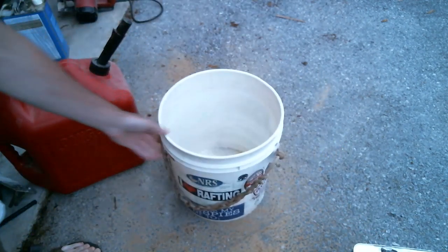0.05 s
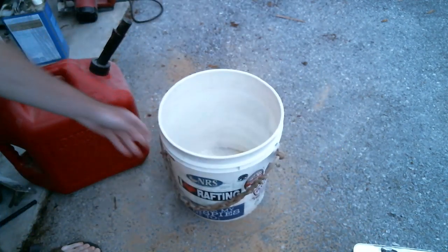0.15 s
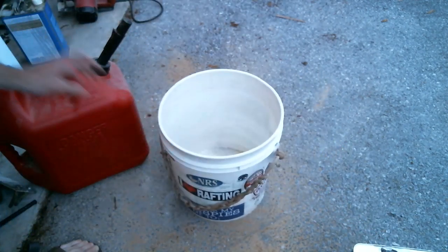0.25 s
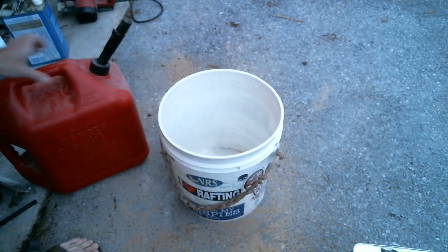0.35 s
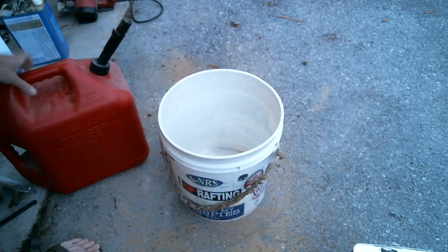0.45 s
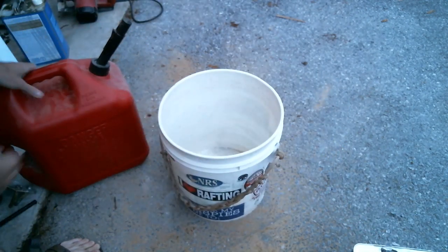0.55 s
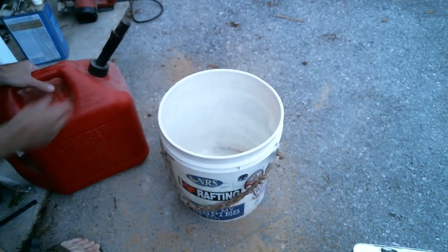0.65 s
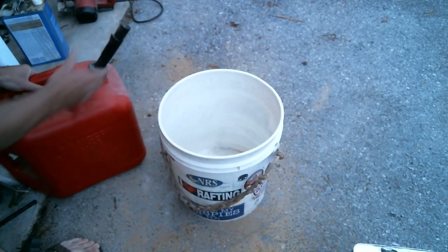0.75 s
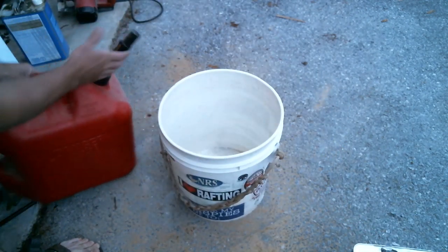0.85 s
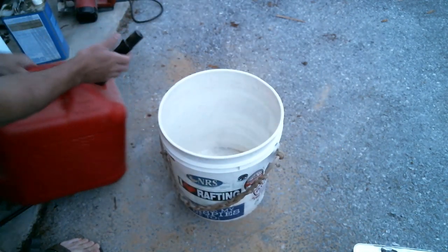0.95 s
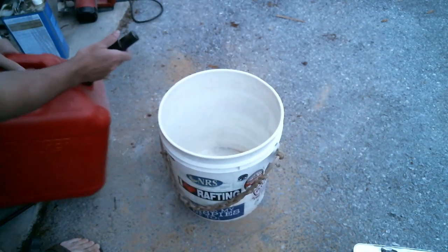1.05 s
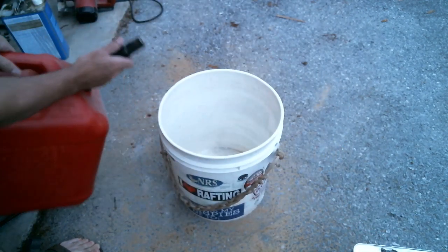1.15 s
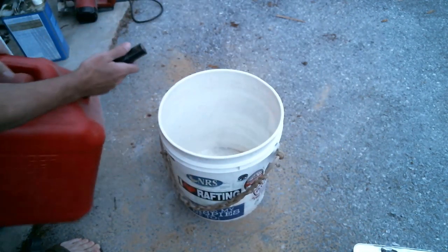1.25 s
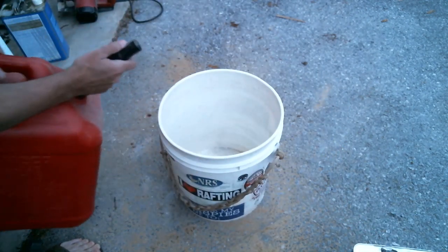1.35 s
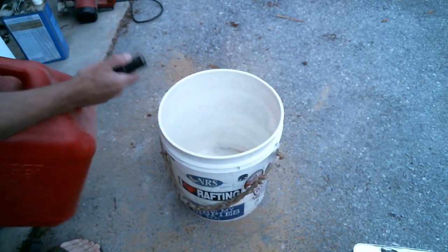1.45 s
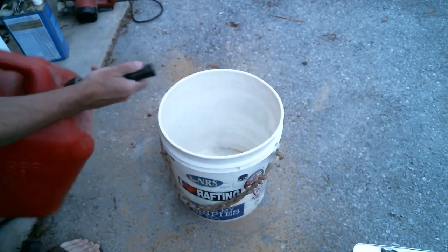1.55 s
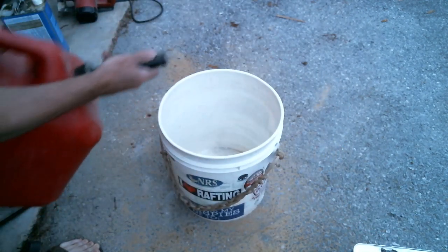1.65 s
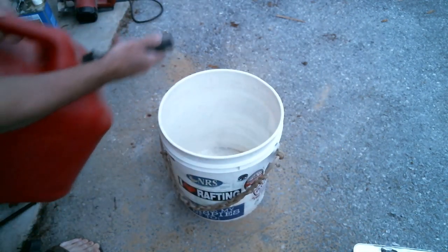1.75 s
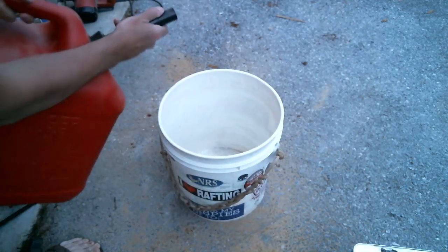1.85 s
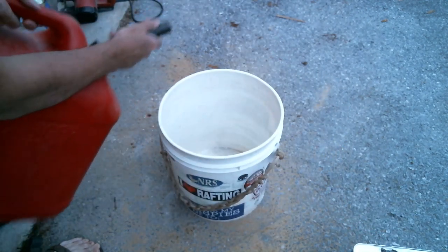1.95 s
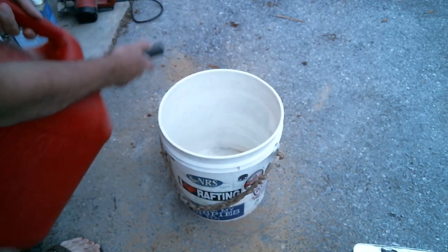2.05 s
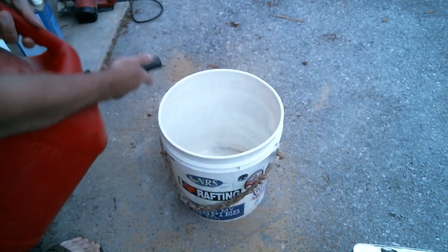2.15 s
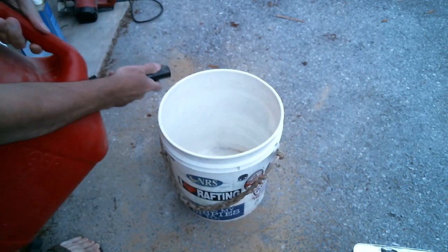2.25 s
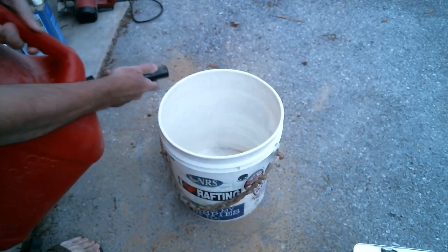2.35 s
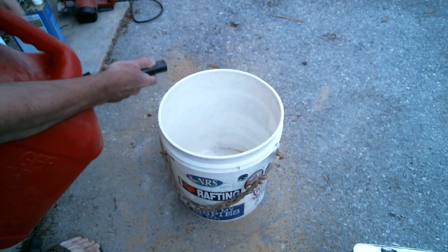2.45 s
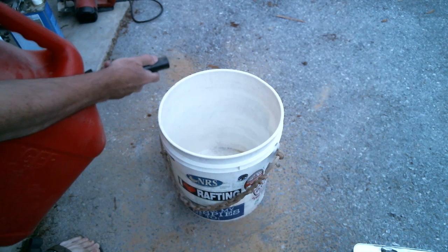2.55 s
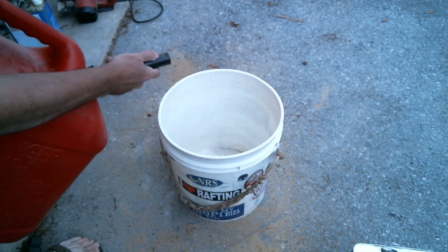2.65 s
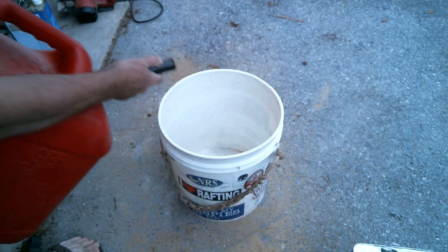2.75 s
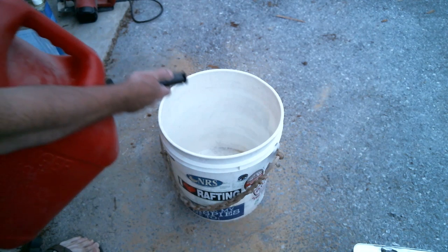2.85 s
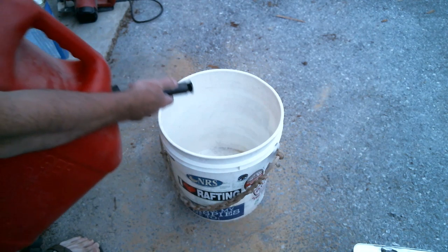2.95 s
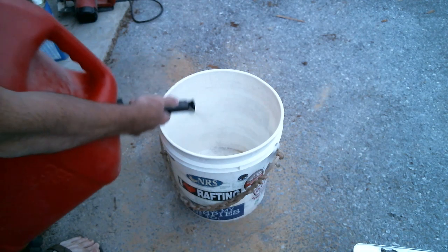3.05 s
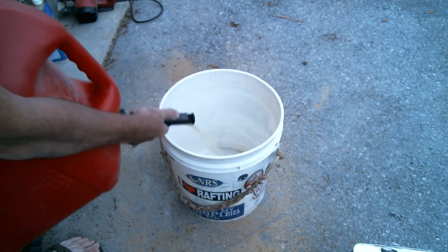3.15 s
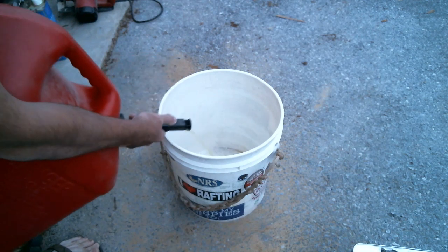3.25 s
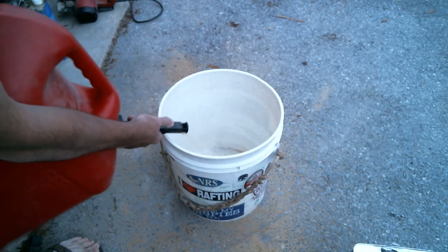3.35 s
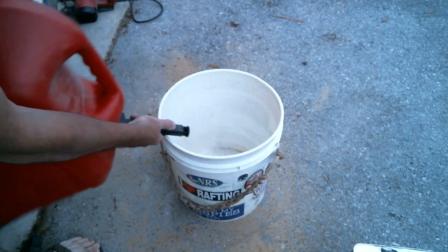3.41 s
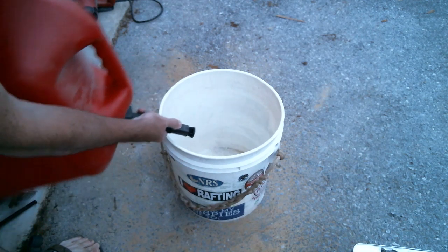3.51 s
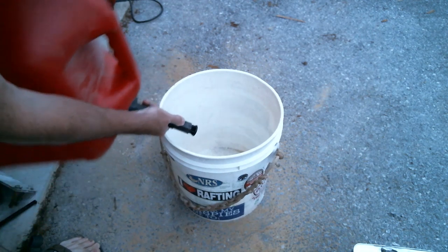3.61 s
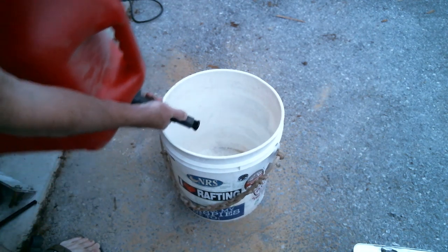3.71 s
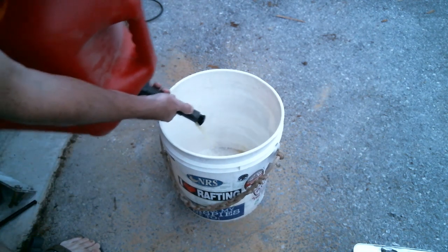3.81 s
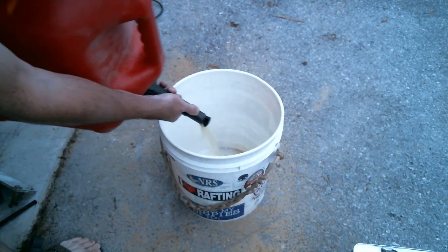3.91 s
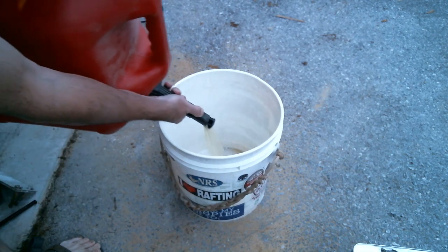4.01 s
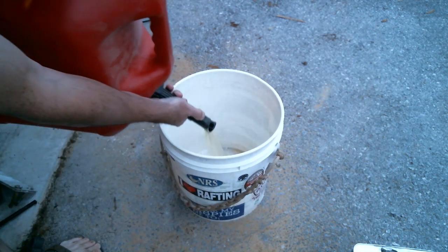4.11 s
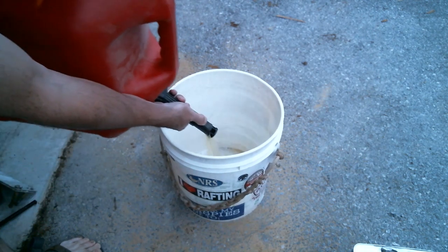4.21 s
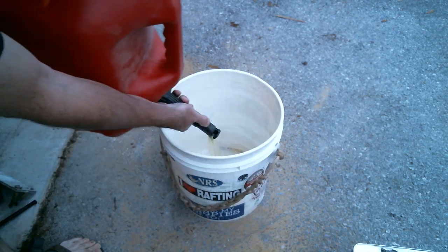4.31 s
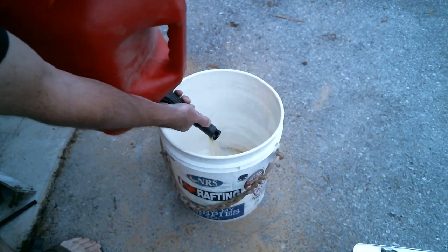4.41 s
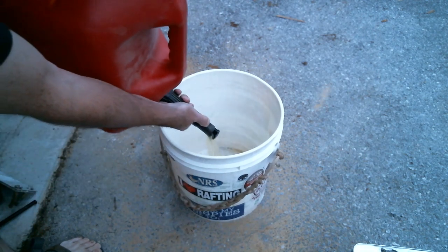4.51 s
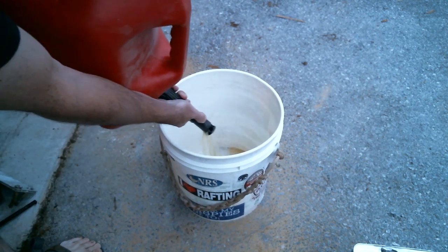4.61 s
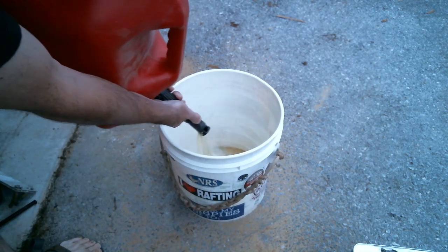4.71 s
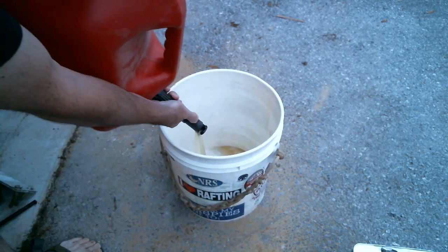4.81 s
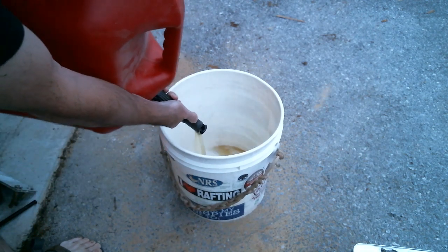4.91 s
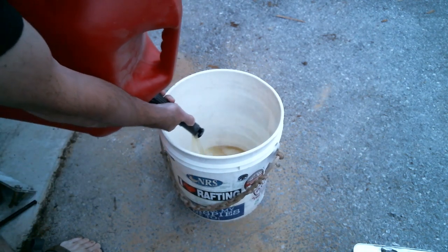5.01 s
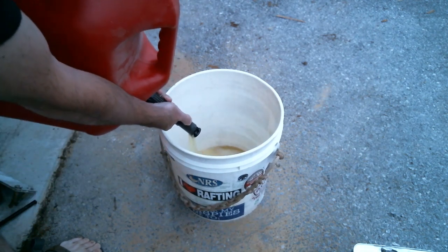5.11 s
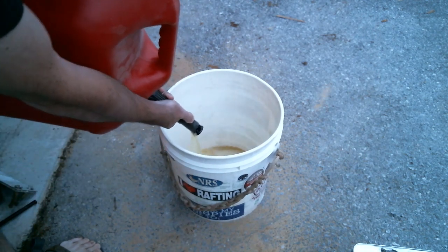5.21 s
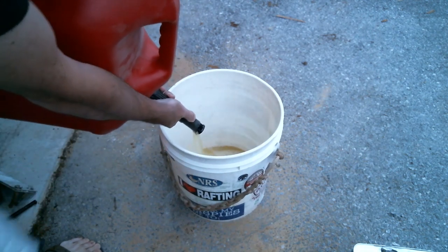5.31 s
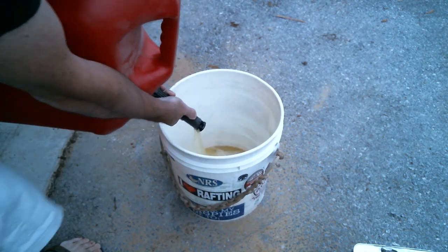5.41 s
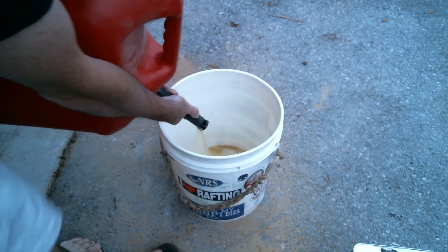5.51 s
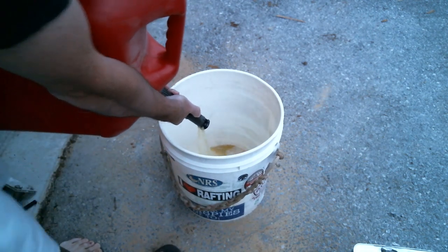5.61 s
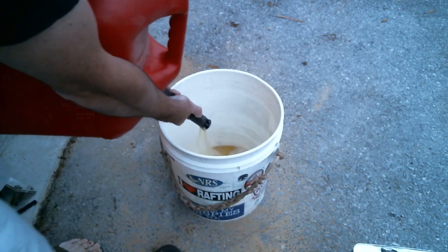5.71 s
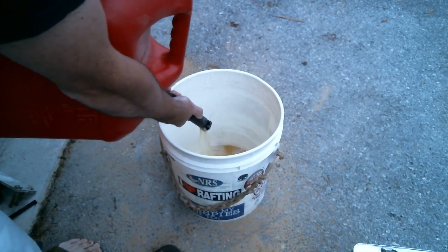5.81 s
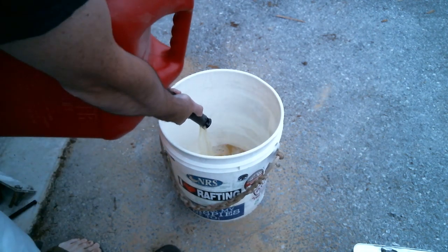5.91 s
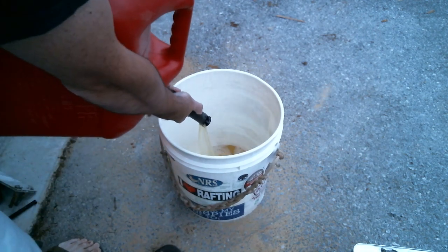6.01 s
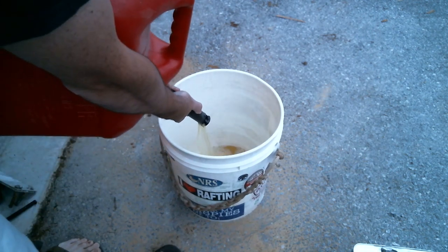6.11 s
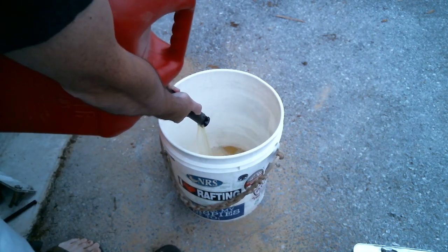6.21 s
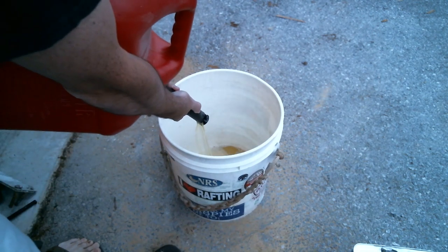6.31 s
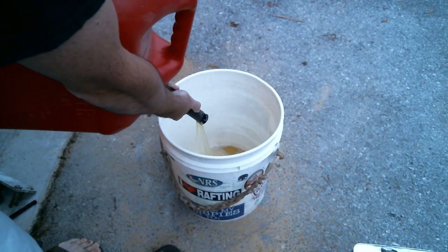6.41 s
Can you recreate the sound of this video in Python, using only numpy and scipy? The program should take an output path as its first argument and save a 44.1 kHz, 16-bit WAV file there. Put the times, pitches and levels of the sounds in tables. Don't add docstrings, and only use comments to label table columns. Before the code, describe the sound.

Quiet open air and a distant low engine sit behind close handling of a full plastic can: skin rustle, dull knocks, a bright brief clank, small squeaks and muffled liquid gulps. After scattered loud drops and one more thud, liquid pours brokenly into a plastic bucket, crackling on the bare floor, then splashing more softly in a shallow puddle. Close single microphone, centred image.

```python
import sys
import numpy as np
from scipy import signal
from scipy.fft import rfft, irfft, next_fast_len
from scipy.io import wavfile
from scipy.ndimage import uniform_filter1d

SR = 44100
rng = np.random.default_rng(int(sys.argv[2]) if len(sys.argv) > 2 else 0)


def log_audio(samples):
    frames = np.atleast_2d(samples).T
    limited = np.clip(frames, -1, 1)
    pcm = np.round(limited * 32767).astype(np.int16)
    wavfile.write(sys.argv[1], SR, pcm)


def undo_db(level):
    steps = np.asarray(level, float) / 20
    return 10 ** steps


N = 284886
TIME = np.arange(N) / SR

# (start_s, peak_db, pitch_hz)
DROPS = [(3.3175, -19, 7800), (3.328, -10, 7000), (3.3416, -12.5, 10000), (3.3847, -16, 10200),
         (3.4112, -22, 8030), (3.4268, -13, 8500), (3.454, -5, 10600), (3.4976, -3, 7070),
         (3.5326, -18.5, 6180), (3.6012, -12, 10000), (3.61, -30.5, 4200), (3.6435, -2.5, 7830),
         (3.686, -27, 7400), (3.699, -15.5, 9800), (3.443, -25, 4700), (3.611, -22, 10000)]
# (start_s, peak_db, pitch_hz)
SLAPS = [(4.0612, -18, 9700), (4.0754, -7.5, 6700), (4.1253, -8, 5220), (4.153, -6.5, 7100),
         (4.179, -8, 4970), (4.2045, -11, 8340), (4.2813, -8, 8100), (4.431, -11, 5640),
         (4.4669, -16, 9600), (4.5244, -12.5, 7000), (4.5487, -11, 8750), (4.615, -15, 7800),
         (4.6863, -14, 6200), (4.7431, -10.5, 8910), (4.843, -4, 6250), (4.864, -14.5, 9400),
         (4.9339, -13, 8500), (5.0395, -7, 6900), (5.0645, -12, 9800), (5.1914, -6.5, 9800),
         (5.2614, -16, 4300)]
# (start_s, peak_db, pitch_hz)
LATE_SLAPS = [(5.4167, -7.5, 9700), (5.4369, -8, 9900), (5.4933, -6.5, 8700), (5.62, -11, 8050),
              (5.7023, -30, 8650), (5.7286, -3.5, 7970), (5.7851, -7, 7900), (5.8336, -4, 8900),
              (5.868, -14.5, 7800), (5.9285, -15.5, 6750), (6.0175, -9, 9100), (6.0462, -14, 9100),
              (6.0647, -8, 8900), (6.1341, -16.5, 8100), (6.26, -15.5, 3360), (6.2992, -13.5, 3400),
              (6.4063, -21, 3700), (6.06, -21, 3650), (6.312, -15, 7500), (6.084, -18, 9200),
              (5.453, -30, 10000), (5.269, -16.5, 3600), (5.793, -21.5, 4560), (6.299, -10.5, 7600),
              (5.026, -20, 9000)]
# (start_s, peak_db, pitch_hz)
DRIPS = [(4.1156, -20, 5100), (4.2307, -18, 8270), (4.2535, -22, 4260), (4.3224, -18, 6950),
         (4.332, -14, 7600), (4.36, -14, 8800), (4.3744, -25, 9250), (4.3984, -37, 8120),
         (4.4946, -26, 7660), (4.5374, -21, 9010), (4.574, -31, 6890), (4.5979, -28, 7800),
         (4.6412, -15.5, 7660), (4.7085, -26, 9090), (4.7538, -12, 6040), (4.8123, -21, 6460),
         (4.8913, -14, 9340), (4.9666, -32, 9770), (4.9911, -20, 9580), (5.03, -7, 8150),
         (5.0714, -25, 8800), (5.094, -19, 8700), (5.145, -23, 9500), (5.1564, -17, 9090),
         (5.23, -14, 9350), (5.2929, -20, 9670), (5.3184, -23, 6270), (5.332, -27, 9850),
         (5.3732, -18, 9950), (5.3887, -23, 8500), (5.4044, -18, 9800), (5.523, -16, 8550),
         (5.5515, -11, 8050), (5.5832, -19, 8760), (5.602, -17, 9600), (5.6612, -21, 7700),
         (5.6755, -27, 9250), (5.7098, -16, 8350), (5.7615, -14.5, 8060), (5.9975, -17, 8600),
         (6.118, -18, 8100), (6.167, -19, 7980), (6.2158, -30, 8600), (6.376, -27, 8600)]
HITS = DROPS + SLAPS + LATE_SLAPS + DRIPS
# (start_s, peak_db, pitch_hz)
THUMPS = [(3.377, -38.5, 760), (3.432, -35, 1220), (3.6, -38, 1510), (3.698, -37, 556), (4.076, -52, 663),
          (4.126, -36, 1510), (4.187, -34, 1120), (4.467, -35, 1340), (4.524, -27.5, 1574),
          (4.702, -40.5, 1125), (4.849, -32.5, 605), (5.197, -69, 1070), (5.42, -40, 1000),
          (5.496, -27.5, 963), (5.573, -34.5, 954), (5.644, -32, 1660), (6.285, -38.5, 1690),
          (6.352, -43, 1510)]
# (time_s, flow_db, lumpiness_db)
FLOW = [(3.3, -70, 0), (3.34, -35.5, -5), (3.45, -53.5, -15.5), (3.572, -56, -7), (3.59, -106, -17),
        (3.7, -40, -20), (3.74, -68, -13), (4.04, -66, -1), (4.17, -30.5, -3), (4.3, -32.5, -4.5),
        (4.6, -36, -2), (4.97, -31, -12), (5.12, -37, -27.5), (5.3, -40.5, -4.5), (5.55, -34.5, -58),
        (5.9, -41.5, -11), (6.2, -46, -8), (6.4, -51, -7)]
# (freq_hz, level_db)
FIZZ = [(1990, -14.5), (2510, -41), (2810, -15), (3640, -14), (4220, -3.5), (9370, 7), (15200, -11),
        (16500, -63)]
SPRAY_S = 0.0094


def evened(x):
    return x / np.sqrt(np.mean(x ** 2) + 1e-20)


def peaked(x, db):
    return undo_db(db) * x / abs(x).max()


def add(mix, s, sound):
    part = mix[round(s * SR):][:len(sound)]
    part += sound[:len(part)]


def curves(rows):
    s, *columns = np.transpose(rows)
    return [np.interp(TIME, s, c) for c in columns]


def coloured(x, points):
    f, db = np.transpose(points)
    size = next_fast_len(len(x))
    hz = np.fft.rfftfreq(size, 1 / SR)
    gain = undo_db(np.interp(np.log(hz + 1), np.log(f + 1), db))
    return irfft(rfft(x, size) * gain, size)[:len(x)]


def resonate(x, hz, width):
    r = np.exp(-np.pi * width / SR)
    return 2 * signal.lfilter([1 - r], [1, -r * np.exp(2j * np.pi * hz / SR)], x).real


def band(x, hz, width):
    return resonate(resonate(x, hz, width), hz, 2 * width)


def body(x, modes):
    total = 0
    for k, (hz, width, db) in enumerate(modes):
        shaken = np.roll(x, 9000 * k)
        total = total + undo_db(db) * evened(resonate(shaken, hz, width))
    return evened(total)


def grainy(per_s, spread_db, decay_s, smooth):
    size = undo_db(spread_db * np.minimum(rng.exponential(1, N), 2.5))
    kicks = size * (rng.random(N) < per_s / SR)
    bursts = signal.lfilter([1], [1, -np.exp(-1 / (decay_s * SR))], kicks)
    return (smooth + evened(bursts)) * rng.standard_normal(N)


def burst(t60, rise_s):
    t = np.arange(6000) / SR
    return rng.standard_normal(6000) * (1 - np.exp(-t / rise_s)) * undo_db(-60 * t / max(t60, .005))


def whistle(length, hz, width, db):
    x = band(rng.standard_normal(12000), hz, width)[-round(length * SR):]
    return undo_db(db) * evened(x) * np.sqrt(np.hanning(len(x)))


def swell(start, length, crest):
    depth_db, bend = 31, 2.33
    span = slice(max(round((start - length / 2) * SR), 0), round((start + 1.5 * length) * SR))
    u = (TIME[span] - start) / length
    crest = np.clip(crest, .05, .95)
    away = np.where(u < crest, (crest - u) / crest, (u - crest) / (1 - crest))
    return span, u, undo_db(-depth_db * away ** bend)


def aftermath(hits, decay_s):
    kicks = np.zeros(N)
    for s, db, *rest in hits:
        kicks[round(s * SR)] = undo_db(db)
    return signal.lfilter([1], [1, -np.exp(-1 / (decay_s * SR))], kicks)


def bubble(db, hz, t60, rise, attack_s):
    t = np.arange(7000) / SR
    envelope = (1 - np.exp(-t / attack_s)) ** 2 * undo_db(-60 * t / max(t60, .01))
    return peaked(envelope * np.sin(2 * np.pi * hz * (t + rise * t ** 2)), db)


def background():
    # (freq_hz, level_db per Hz)
    air_colour = [(18, -53), (30, -27), (124, 3), (252, -2.5), (554, -9), (988, -12.5), (10200, -31.5),
                  (16000, -83)]
    # (time_s, level_db)
    engine = [
        (0, -77),
        (.6, -56.5),
        (1.4, -64.5),
        (1.9, -55),
        (2.7, -69),
        (4, -70),
        (5.6, -69.5),
        (6.46, -63),
    ]
    # (pitch_hz, level_db)
    drone = [(328.4, -65.5), (382.2, -61.5), (500.6, -69), (554.5, -67)]
    firings_per_s, first_firing = 16.4, .44
    air = undo_db(-62) * evened(coloured(grainy(per_s=13, spread_db=-4.5, decay_s=0.03, smooth=4), air_colour))
    gate = np.exp(1.6 * np.cos(2 * np.pi * (firings_per_s * TIME + first_firing)))
    wander = evened(uniform_filter1d(uniform_filter1d(rng.standard_normal((2, N)), 900), 900))
    pipe = np.sin(2 * np.pi * np.cumsum(146 + 14 * wander[0]) / SR) * undo_db(1.4 * wander[1])
    throb = undo_db(curves(engine)[0]) * evened(gate * pipe)
    hum = sum(undo_db(db + 1.0) * np.sin(2 * np.pi * (hz * TIME + rng.random())) for hz, db in drone)
    return air + throb + hum * np.clip((.52 - TIME) / 0.13, 0, 1)


def hands():
    # (freq_hz, level_db)
    hiss_colour = [(2060, -44), (3500, -11), (4540, -8), (4900, -2), (6910, 7.5), (9560, 7.5), (11800, 0.5),
                   (15000, -27)]
    # (freq_hz, level_db)
    rasp_colour = [(760, -49), (1300, -7), (1590, -0.5), (2560, 0.5), (4560, 0), (6000, -5.5), (7800, -20),
                   (13200, -120)]
    # (start_s, length_s, crest 0-1, hiss_db, rasp_db)
    strokes = [(0.056, 0.28, 0, -69, -69.5), (0.508, 0.26, 0.35, -48, -73),
               (0.789, 0.17, 0.67, -48.5, -43.5), (1.268, 0.09, 0.72, -62.5, -76),
               (1.38, 0.56, 0.34, -48.5, -57.5), (1.924, 0.07, 0.3, -59, -47), (2.24, 0.045, 0.4, -61, -69),
               (2.359, 0.19, 0.26, -61, -54.5), (2.418, 0.13, 0.64, -36.5, -42),
               (2.604, 0.17, 0.33, -63, -57), (2.764, 0.091, 0.49, -48.5, -64.5),
               (2.865, 0.094, 0.49, -66, -60), (2.945, 0.069, 0.27, -60.5, -69),
               (3.035, 0.22, 0, -67.5, -65), (3.704, 0.11, 0.27, -47, -39), (3.794, 0.088, 0.5, -69, -51.5),
               (3.925, 0.055, .45, -60, -68)]
    # (start_s, length_s, pitch_hz, level_db)
    squeaks = [(1.445, 0.055, 2580, -59), (1.507, 0.21, 2000, -61), (1.619, 0.12, 3070, -55),
               (2.047, 0.077, 3120, -54.5), (2.145, 0.078, 3800, -62.5), (3.927, 0.059, 3850, -61),
               (1.318, 0.035, 3800, -65.5), (1.292, 0.018, 2880, -65), (1.292, .022, 1150, -63),
               (.88, 0.026, 6940, -39.5), (3.697, 0.012, 3250, -33), (.01, 0.039, 1020, -48.5),
               (2.201, 0.037, 1186, -53), (3.042, 0.053, 1920, -56.5), (4.28, 0.0098, 2920, -26),
               (5.224, 0.051, 4050, -42.5)]
    hiss = evened(coloured(grainy(per_s=300, spread_db=3, decay_s=.004, smooth=1.8), hiss_colour))
    rasp = evened(coloured(grainy(per_s=150, spread_db=3, decay_s=.006, smooth=1.2), rasp_colour))
    out = np.zeros(N)
    for *when, hiss_db, rasp_db in strokes:
        span, u, gain = swell(*when)
        out[span] += gain * (undo_db(hiss_db) * hiss[span] + undo_db(rasp_db) * rasp[span])
    for s, length, hz, db in squeaks:
        add(out, s, whistle(length, hz, 210, db - 1.5))
    return out


def shudders(lumps):
    # (start_s, length_s, crest 0-1, level_db)
    shakes = [
        (0.776, 0.09, 0.63, -49),
        (0.856, 0.044, 0.12, -30),
        (0.888, 0.056, 0.45, -43.5),
        (1.099, .11, .05, -36),
        (1.664, 0.097, 0.45, -51.5),
        (1.913, 0.14, 0.08, -62),
        (2.334, 0.22, 0.55, -50),
        (2.616, 0.14, 0.15, -55.5),
        (3.719, 0.071, 0, -29.5),
        (3.768, 0.15, 0.35, -42.5),
    ]
    wall_colour = [(300, -44.0), (500, -0.5), (800, -2.0), (1200, -6.0), (1700, -7.5), (2500, -40.5)]
    wall = evened(coloured(lumps, wall_colour))
    out = np.zeros(N)
    for *when, db in shakes:
        span, u, gain = swell(*when)
        out[span] += undo_db(db) * gain * wall[span]
    return out


def gulps(lumps):
    # (start_s, length_s, crest 0-1, level_db, pitch_hz)
    lurches = [(0, 0.097, 0, -31, 226.5), (0.858, 0.11, 0.4, -40, 315), (1.101, 0.068, .05, -43.5, 325),
               (1.926, 0.072, 0, -58.5, 188), (2.374, .15, 0.18, -44, 337.3),
               (2.719, 0.15, 0.9, -42, 302.6), (2.826, 0.065, 0.18, -39, 126.4),
               (3.021, 0.22, 0.39, -36.5, 136.2), (3.712, 0.077, 0.4, -43, 301),
               (3.75, 0.0597, 0.7, -41, 152.3), (3.778, 0.19, 0.44, -40.5, 317.7)]
    sag = .1
    wobble = signal.hilbert(band(lumps, 2000, 35)) * np.exp(-2j * np.pi * 2000 * TIME)
    out = np.zeros(N)
    for *when, db, hz in lurches:
        span, u, gain = swell(*when)
        turns = np.cumsum(hz * (1 - sag * (u - .5))) / SR
        tone = (wobble[span] * np.exp(2j * np.pi * turns)).real
        out[span] += undo_db(db) * gain * evened(tone)
    return out


def knocks():
    # (start_s, peak_db, pitch_hz)
    blows = [(0.017, -42, 258), (0.829, -28, 150), (0.858, -4.5, 325), (0.89, -19.5, 306),
             (1.925, -17, 810), (1.934, -19.5, 960), (2.384, -22, 760), (2.699, -31, 1340),
             (2.734, -31.5, 310), (2.847, -32, 105), (3.722, -5.5, 347), (3.737, -8, 240), (3.811, -8, 360)]
    # (start_s, peak_db, pitch_hz)
    ticks = [(0.615, -33, 4970), (0.841, -32.5, 7800), (0.831, -27, 2460), (0.8996, -16.5, 3460),
             (1.4281, -22.5, 9450), (2.43, -27.5, 7840), (3.0998, -30.5, 5060), (3.724, -12, 1960),
             (4.0223, -37.5, 9000)]
    out = np.zeros(N)
    for s, db, hz in blows:
        blow = band(burst(0.091, rise_s=0.00057), hz, 1300)
        add(out, s, peaked(resonate(blow, hz, 0.253 * hz) + 0.15 * blow, db - 10))
    for s, db, hz in ticks:
        tick = burst(0.018, rise_s=0.0009)
        add(out, s, peaked(band(band(tick, hz, 3800), hz, 3800), db - 1.5))
    return out


def can():
    lumps = grainy(per_s=50, spread_db=3, decay_s=.012, smooth=1.2)
    return shudders(lumps) + gulps(lumps) + knocks()


def clank():
    # (pitch_hz, level_db, t60_s, beat_hz, partner share; negative starts opposed)
    modes = [(1728, -15, 0.16, 24, -0.38), (3370, -31.5, 0.51, 12.5, -.85), (3984, -6.5, 0.14, 17, -0.28),
             (5416, -24, 0.22, 15, -0.65), (5744, -15.5, 0.2, 11, -0.15), (6350, -30.5, 0.3, 16, -.6),
             (6900, -30.5, 0.25, 23, -0.16), (7725, -28, 0.13, 30, .4), (7903, -18, 0.14, 18, 0.031),
             (8380, -30, 0.2, 28, -.6), (9512, -35, 0.15, 20, 0.41), (10420, -25, 0.16, 30, 0.3),
             (11180, -29, 0.13, 42, -0.22), (2503, -28, .15, 35, -0.78)]
    start_s = 1.1005
    t, out = np.arange(15000) / SR, np.zeros(N)
    ring = 0
    for hz, db, t60, beat, share in modes:
        tone = undo_db(db - 60 * t / t60) * np.sin(2 * np.pi * (hz * t + rng.random()))
        ring = ring + tone * (1 + share * np.cos(2 * np.pi * beat * t))
    damp = np.clip((.165 - t) / 0.035, 0, 1)
    add(out, start_s, undo_db(-11) * 3 * ring * damp * (1 - np.exp(-t / 0.002)))
    add(out, start_s, peaked(band(burst(0.008, rise_s=0.0003), 2000, 1700), -6))
    add(out, start_s, peaked(band(burst(0.19, rise_s=0.0014), 1780, 240), -14))
    rattle_colour = [(900, -9), (2500, 0), (11000, -19), (12500, -60)]
    add(out, start_s, peaked(coloured(burst(0.25, rise_s=0.0012), rattle_colour), -21.0))
    add(out, start_s + .1, whistle(.075, 3120, 90, -58))
    add(out, start_s + .138, whistle(.03, 1730, 150, -63))
    for hz, db in (11700, -52), (13400, -58), (14700, -55):
        add(out, start_s, whistle(.04, hz, 90, db))
    return coloured(out, [(150, -23.0), (500, -1.0)])


def glugs():
    # (start_s, peak_db, pitch_hz, t60_s)
    air_pockets = [(2.648, -46.5, 300, 0.043), (2.65, -50.5, 845, 0.072), (2.705, -52, 340, 0.097),
                   (2.736, -41.5, 303, 0.083), (2.778, -36, 340, 0.083), (2.805, -33.5, 282, 0.1),
                   (2.812, -44.5, 607, 0.037), (2.851, -40, 489, 0.045), (2.965, -48.5, 264, 0.047),
                   (2.988, -48.5, 250, 0.15), (3.035, -42.5, 318, 0.051), (3.046, -54, 585, 0.05),
                   (3.074, -41, 368, 0.085), (3.112, -38, 376, 0.07), (3.149, -51, 320, 0.054),
                   (1.934, -33, 900, 0.04), (3.444, -39, 1224, 0.04), (3.377, -40.5, 1534, 0.032),
                   (3.608, -41, 1270, 0.038), (3.736, -18, 308, 0.013), (.02, -37, 346, 0.069)]
    out = np.zeros(N)
    for s, db, hz, t60 in air_pockets:
        add(out, s - .003, bubble(db, hz, t60, rise=.3, attack_s=.005))
    return out


def plinks():
    # (start_s, peak_db, pitch_hz)
    trapped = [(4.0762, -31, 1210), (4.1295, -28, 1550), (4.182, -30, 1684), (4.2055, -34, 1556),
               (4.2874, -26.5, 1670), (4.3205, -39, 1600), (4.3626, -33, 1530), (4.433, -31.5, 1530),
               (4.468, -30, 1530), (4.5246, -19.5, 1512), (4.6185, -37, 1530), (4.64, -30, 1680),
               (4.6614, -36, 1810), (4.6994, -29, 1088), (4.7515, -29.5, 1650), (4.7723, -25.5, 1377),
               (4.8206, -25, 1378), (4.8594, -34, 1330), (4.8936, -32, 1330), (4.9155, -31, 1307),
               (4.9503, -41, 1380), (5.0425, -31.5, 1650), (5.0853, -33, 1570), (5.103, -30, 1750),
               (5.1638, -39, 1780), (5.1922, -33, 1090), (5.2903, -38, 1440), (5.389, -39, 1660),
               (5.4155, -31.5, 1450), (5.4396, -37, 1790), (5.4927, -16, 1363), (5.569, -39, 1370),
               (5.5863, -32.5, 1720), (5.6449, -25.5, 1490), (5.6752, -37, 1600), (5.981, -40, 1520),
               (6.2617, -32, 1720), (6.2869, -36.5, 1707), (6.3533, -32.5, 1740)]
    out = np.zeros(N)
    for (s, db, hz), (a, b) in zip(trapped, rng.random((len(trapped), 2))):
        add(out, s, bubble(db - 9, hz, t60=.06 * (.6 + a), rise=.6 * b, attack_s=.002))
        splash = burst(0.074, rise_s=0.0014)
        add(out, s, peaked(band(splash, hz, 360), db - 8.0))
        add(out, s, peaked(sum(band(splash, f, 91) for f in (1380, 1750, 1000, 790)), db - 11.0))
    return out


def bucket():
    # (pitch_hz, width_hz, level_db)
    plate_modes = [(507.5, 26, -6.5), (637, 25, -5.5), (782, 17, -2), (1000, 45, 1.5)]
    # (pitch_hz, width_hz, level_db)
    wall_modes = [(1220, 610, 15.4), (1450, 29, 7.3), (1605, 250, 17.7), ]
    # (start_s, length_s, level_db)
    hoots = [(3.314, 0.096, -58.5), (3.433, 0.14, -51.5), (3.556, 0.073, -55), (4.059, 0.13, -58),
             (4.216, 0.11, -57.5), (4.695, 0.08, -53), (4.952, 0.1, -53), (5.133, 0.081, -55.5),
             (5.489, 0.15, -46.5), (5.622, 0.15, -46.5), (5.781, 0.15, -47.5), (5.943, 0.14, -47.5),
             (6.084, 0.11, -50), (6.212, 0.12, -50), (6.333, 0.074, -51)]
    # (start_s, length_s, pitch_hz, level_db)
    rings = [(1.945, 0.05, 1000, -47), (2.147, 0.14, 238, -55.5), (3.738, 0.19, 129, -32),
             (4.716, 0.15, 604, -45), (5.11, 0.11, 994, -43), (5.274, 0.056, 1000, -46.5),
             (4.06, 0.043, 650, -51.5), (4.16, 0.042, 615, -49), (4.241, 0.11, 507, -49.5),
             (4.33, 0.06, 1545, -47), (4.702, 0.05, 1000, -46), (4.797, 0.077, 1000, -40),
             (4.489, .07, 1000, -42), (4.221, 0.17, 790, -54.5), (4.616, .07, 1000, -49),
             (5.48, 0.065, 515, -43.5), (5.757, .03, 680, -53), (5.866, 0.043, 563, -48),
             (5.129, 0.14, 790, -58), (5.41, 0.085, 1000, -41), (5.49, .15, 1000, -41),
             (5.795, 0.15, 985, -51)]
    flow_db, lumpy_db = curves(FLOW)
    on = TIME > FLOW[0][0]
    stir_db = 0.68 * (flow_db + 36) + 0.43 * lumpy_db
    shake = grainy(per_s=25, spread_db=4, decay_s=.025, smooth=.9)
    patter = grainy(per_s=60, spread_db=5, decay_s=.007, smooth=.5)
    plate = undo_db(-53 + stir_db) + undo_db(-13) * aftermath(THUMPS, decay_s=0.031)
    wall = undo_db(-50 + stir_db) + undo_db(-51.5) * aftermath(HITS, SPRAY_S)
    out = on * plate * body(band(shake, 570, 1140), plate_modes)
    out += on * wall * body(band(patter, 1890, 1700), wall_modes)
    for s, length, db in hoots:
        add(out, s, whistle(length, 261.4, 31.3, db + 7.0))
    for s, length, hz, db in rings:
        add(out, s, whistle(length, hz, 47, db))
    return out


def droplets(lo_hz, hi_hz, count, patchy):
    patch_s, patch_db = .022, 4.2
    knots = patchy * np.arange(0, 7, patch_s)
    fizz = np.zeros(N)
    for hz in np.geomspace(lo_hz, hi_hz, count):
        bursts = grainy(per_s=110, spread_db=4.2, decay_s=.0025, smooth=.3)
        patches = undo_db(patchy * patch_db * np.interp(TIME, knots, rng.standard_normal(len(knots))))
        fizz += band(bursts * patches, hz, 0.37 * hz) / np.sqrt(hz)
    return evened(coloured(fizz, FIZZ))


def spatter():
    per_s = 60
    out, t = np.zeros(N), np.arange(-30, 300) / SR
    for when, size, pitch in rng.random((round(per_s * N / SR), 3)):
        wet_tail = .5 * (t > 0) * np.exp(-t / .002) * rng.standard_normal(len(t))
        shape = np.exp(-(t / .00035) ** 2) + wet_tail
        tone = np.cos(2 * np.pi * (5500 + 5500 * pitch) * t)
        add(out, when * N / SR, undo_db(14 * size ** 2) * shape * tone)
    return evened(coloured(out, FIZZ))


def spray():
    spray_db, slug_hz = -23.5, 6000
    flow_db, lumpy_db = curves(FLOW)
    slugs = [hit for hit in HITS if hit[2] < slug_hz]
    fine = undo_db(flow_db) + undo_db(spray_db) * aftermath(HITS, SPRAY_S)
    coarse = undo_db(flow_db + lumpy_db) + undo_db(spray_db) * aftermath(slugs, SPRAY_S)
    out = fine * droplets(7950, 21600, count=4, patchy=1)
    out += coarse * droplets(2320, 4220, count=3, patchy=1.25)
    out += undo_db(flow_db - 13) * spatter()
    return (TIME > FLOW[0][0]) * out


def thumps():
    out = np.zeros(N)
    for s, db, hz in THUMPS:
        blow = band(burst(0.089, rise_s=0.0007), hz, 1000)
        ring = evened(resonate(blow, hz, 57)) * np.std(blow)
        add(out, s, peaked(blow + 0.71 * ring, db + 5.5))
    return coloured(out, [(150, -14), (450, -1)])


def slaps():
    out, t = np.zeros(N), np.arange(-60, 200) / SR
    for s, db, hz in HITS:
        snap = np.exp(-(t / 0.00027) ** 2) * np.cos(2 * np.pi * hz * t)
        add(out, s, undo_db(db - 3) * snap)
        add(out, s, peaked(band(burst(0.012, rise_s=0.0006), hz, 2000), db - 8))
        tail = band(burst(.03, rise_s=.001), .55 * hz + 3800, 2000)
        add(out, s + .0015, peaked(tail, db - 17))
    return coloured(out, [(1500, -8.0), (2700, -14.0), (3600, 3.5), (9000, -2), (16000, -6.0)])


def scene():
    puddle_s = 5.07
    mono = background() + hands() + can() + clank()
    pour = glugs() + plinks() + bucket() + spray() + thumps() + slaps()
    finest = coloured(pour, [(10500, -12.5), (12500, -0.5)])
    mono += pour - np.clip(TIME - puddle_s, 0, .9) * finest
    skew = undo_db(-29.5) * np.roll(mono - 0.78 * np.roll(mono, 1), 37)
    return np.array([mono + skew, mono - skew])


def band_limit(x):
    return signal.sosfilt(signal.butter(12, 16650, fs=SR, output="sos"), x)


def record(dry):
    # (freq_hz, level_db)
    mic = [(25, -28.5), (60, -4), (100, 2.5), (11500, -0.5), (13000, -6.5), (15800, -5), (16300, -37.5)]
    mix = np.array([coloured(channel, mic) for channel in dry])
    return band_limit(mix)


dry = scene()
out = record(dry)
log_audio(out)
```